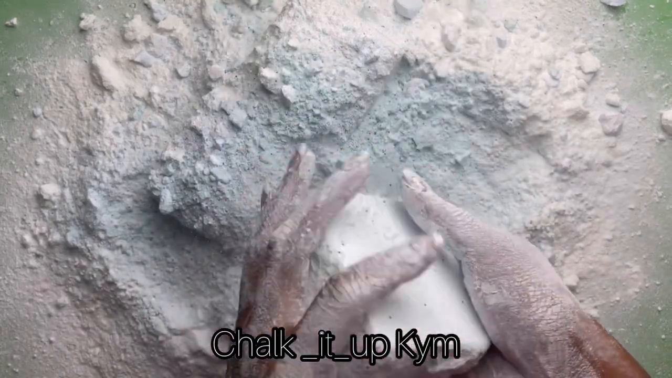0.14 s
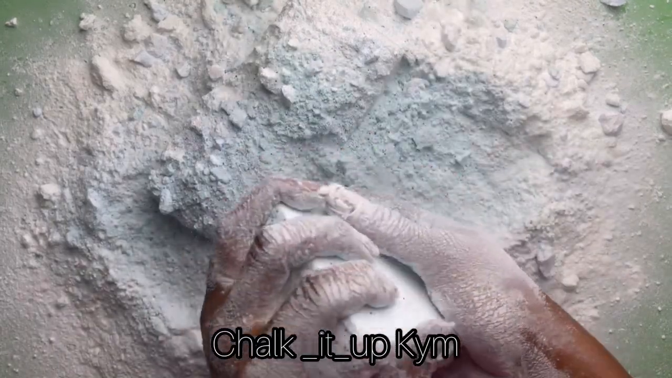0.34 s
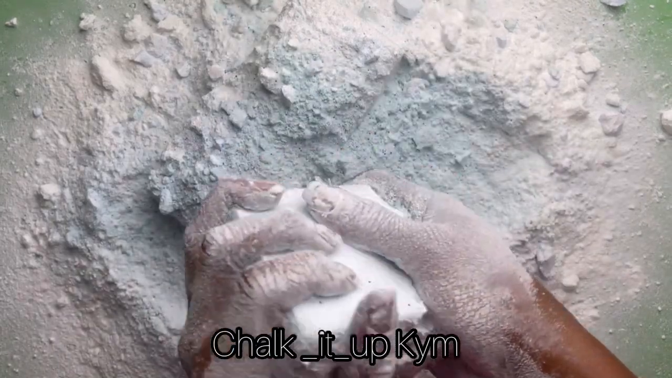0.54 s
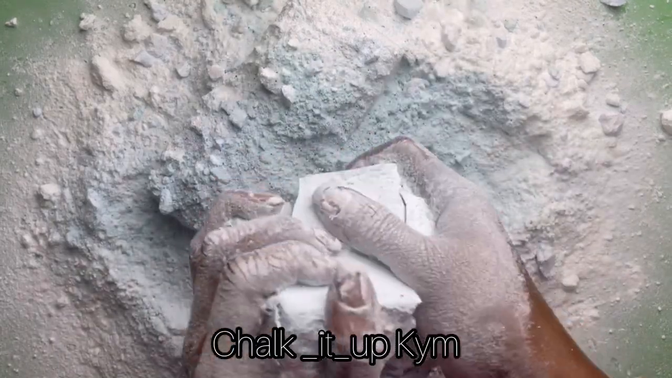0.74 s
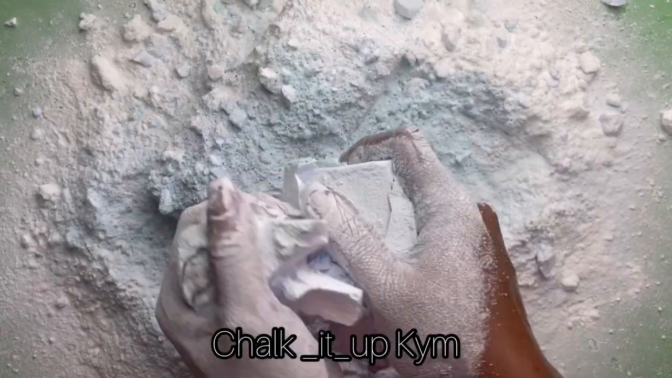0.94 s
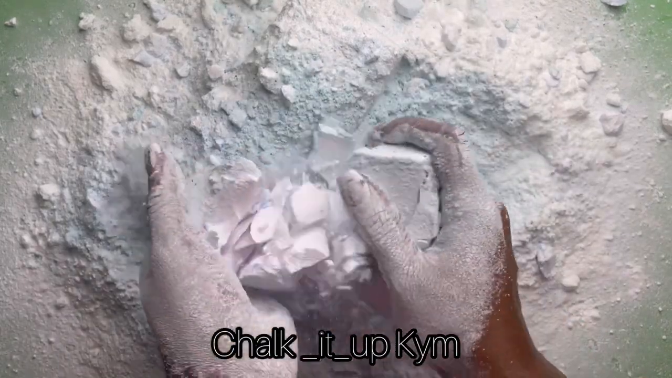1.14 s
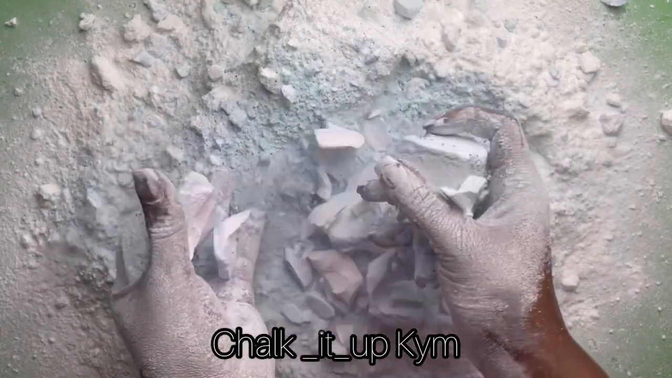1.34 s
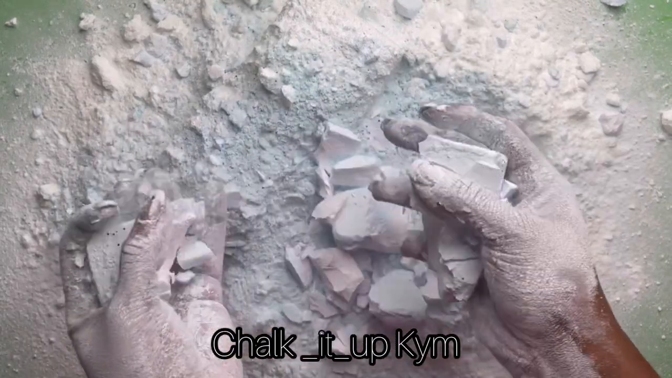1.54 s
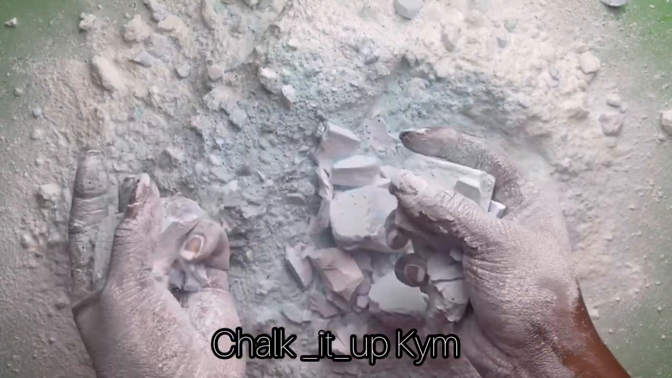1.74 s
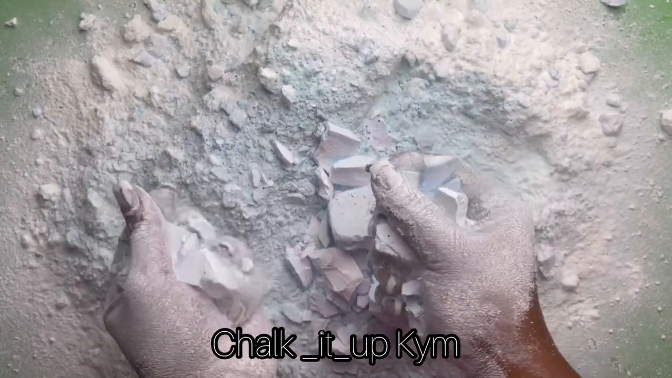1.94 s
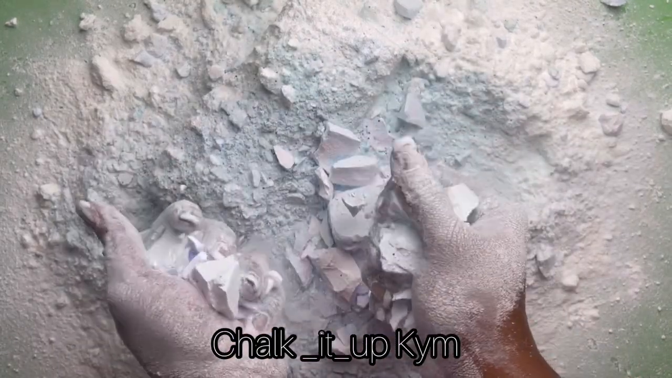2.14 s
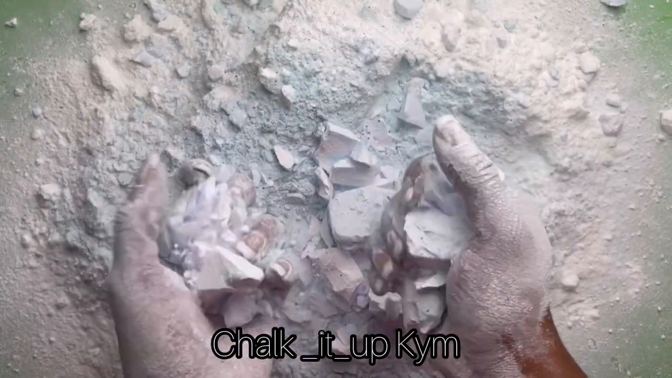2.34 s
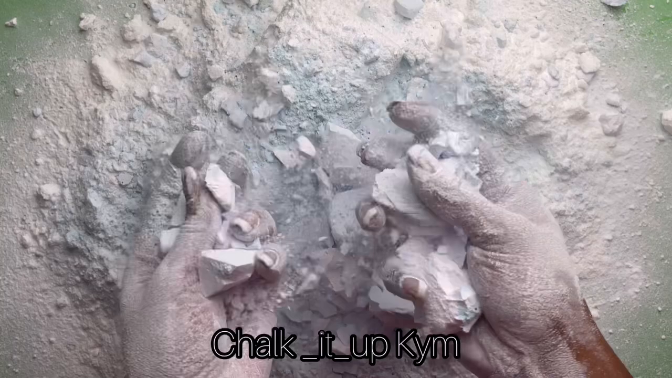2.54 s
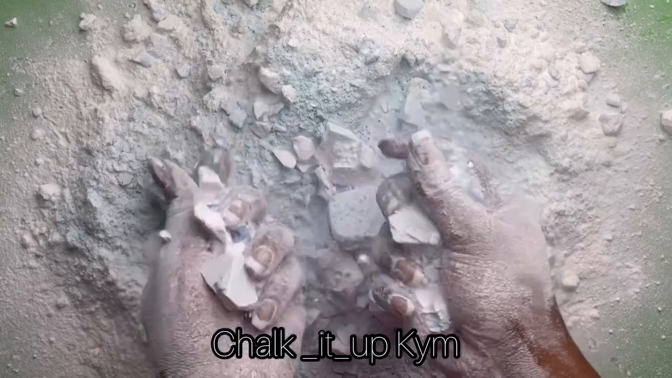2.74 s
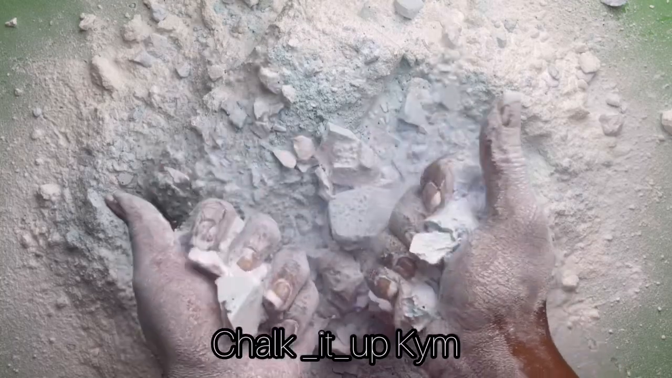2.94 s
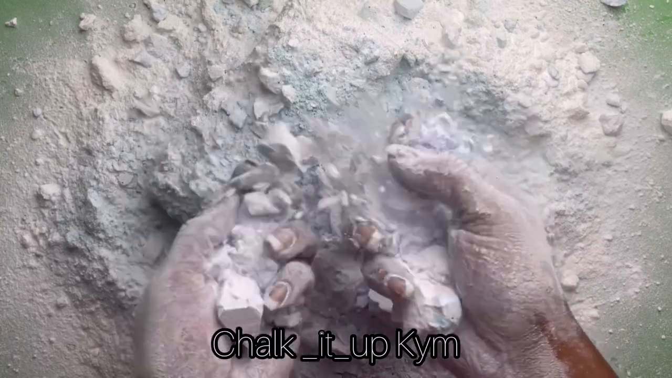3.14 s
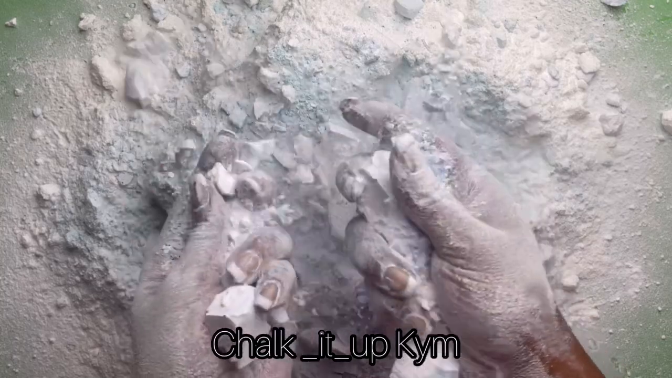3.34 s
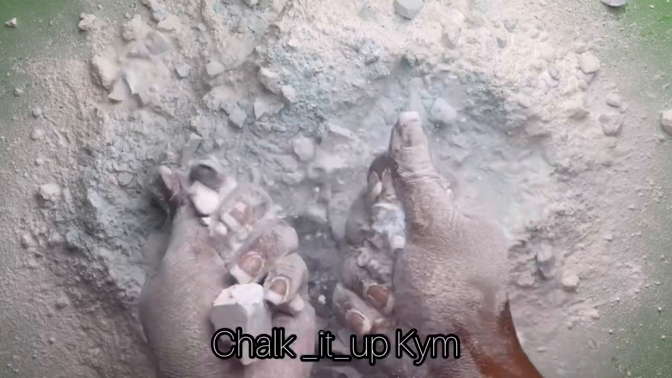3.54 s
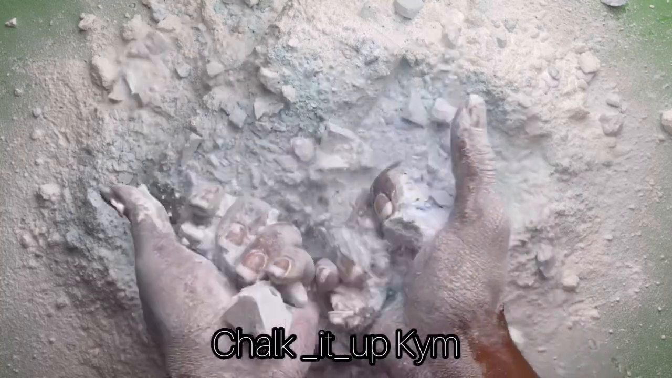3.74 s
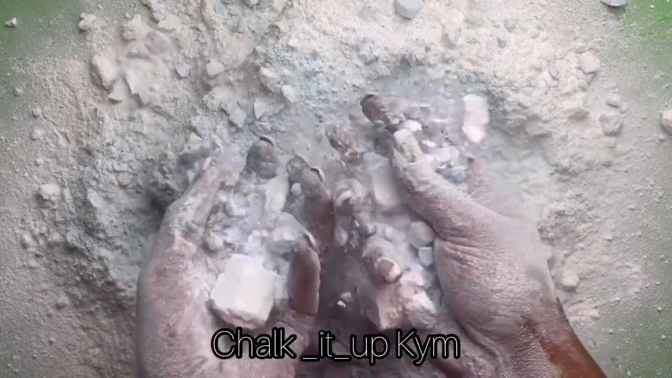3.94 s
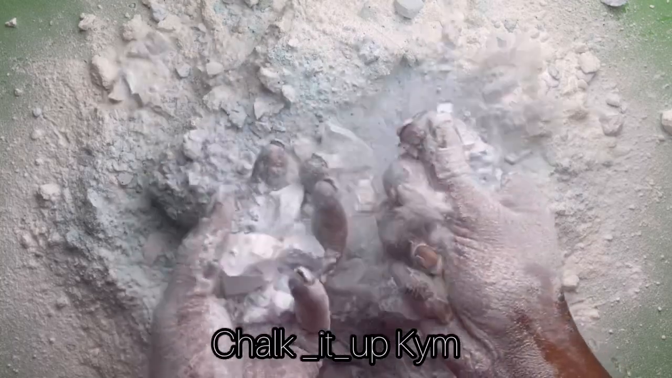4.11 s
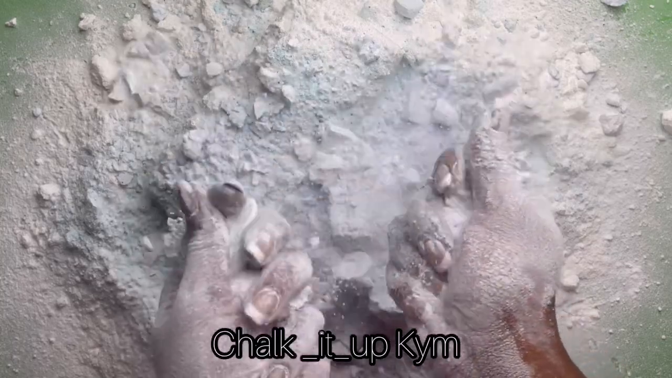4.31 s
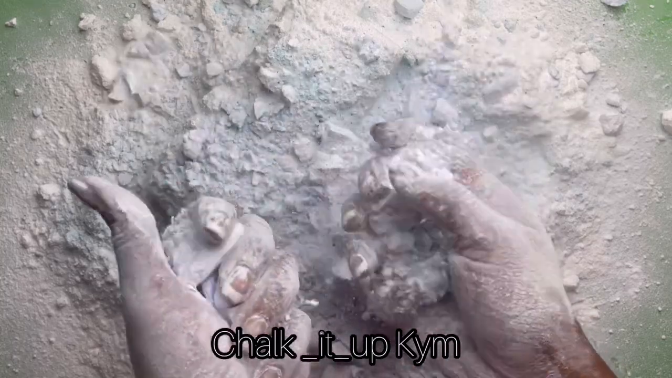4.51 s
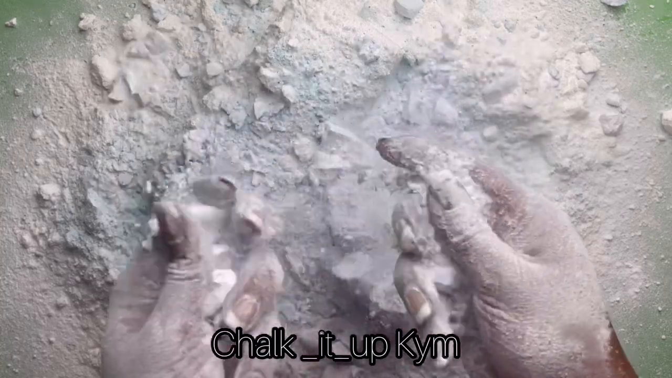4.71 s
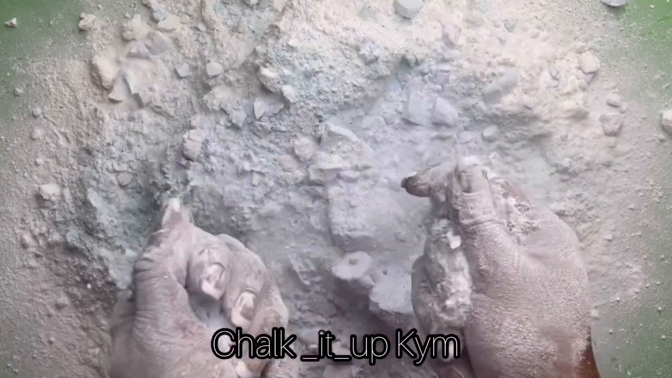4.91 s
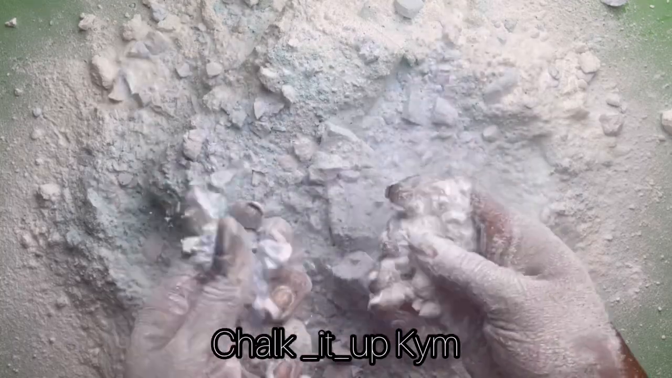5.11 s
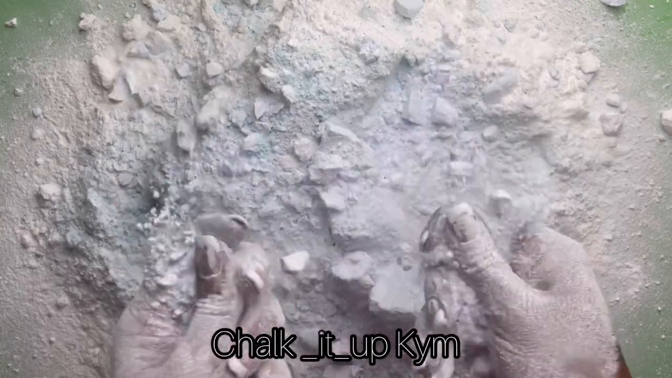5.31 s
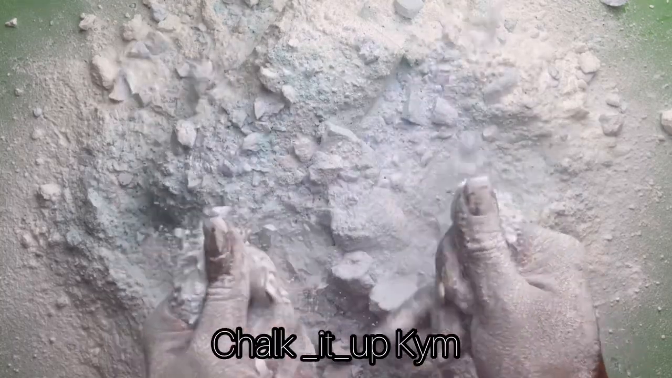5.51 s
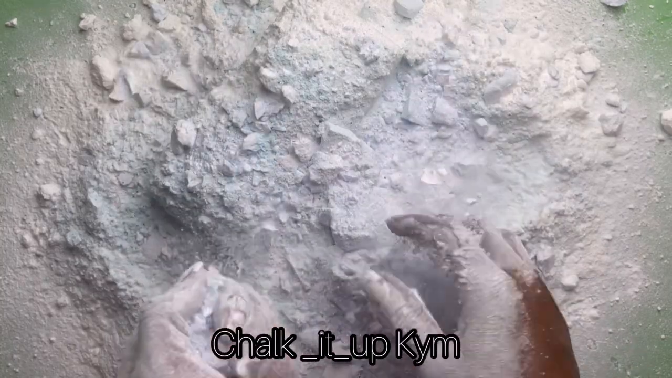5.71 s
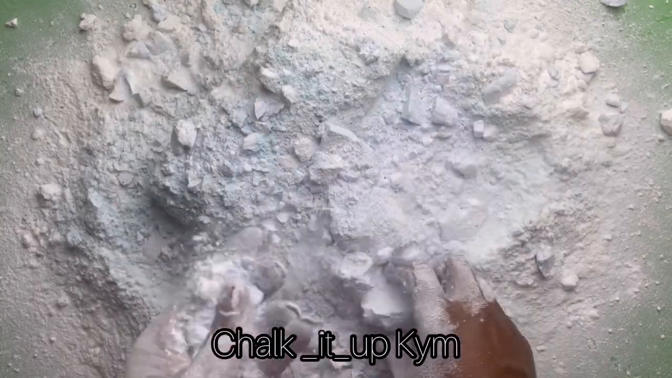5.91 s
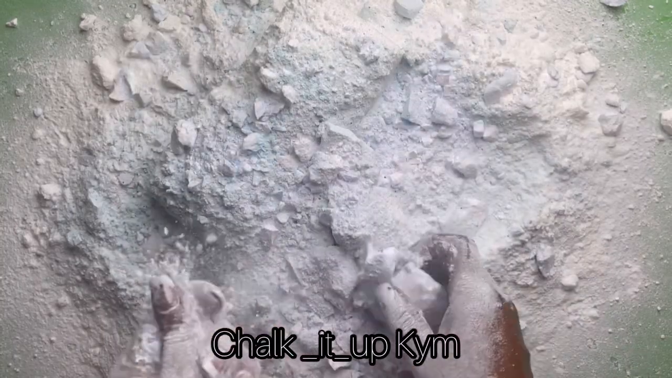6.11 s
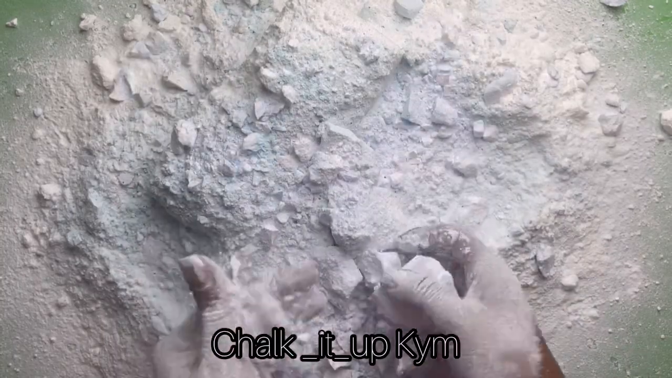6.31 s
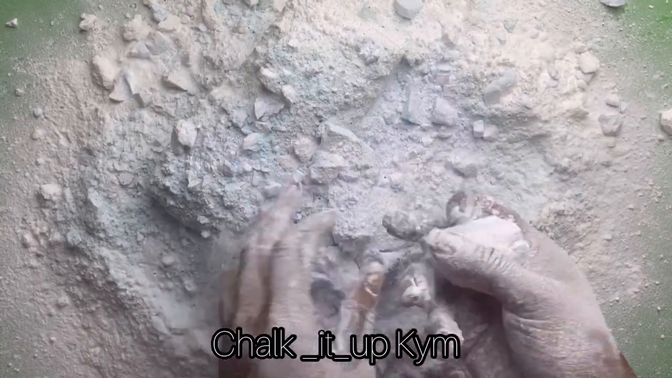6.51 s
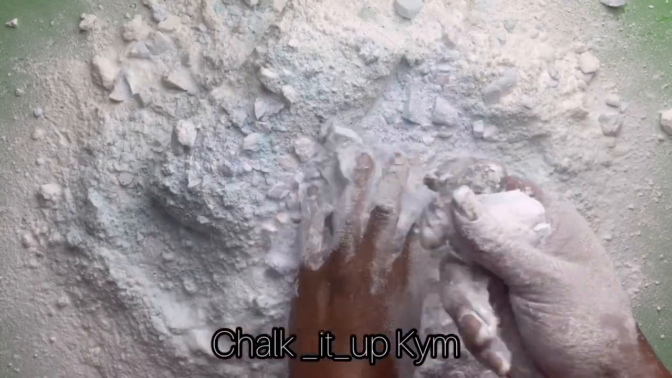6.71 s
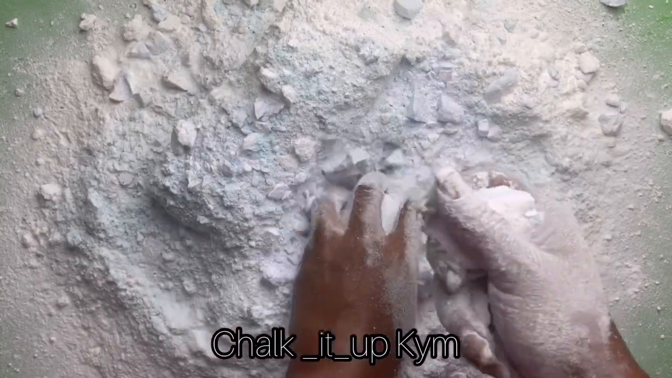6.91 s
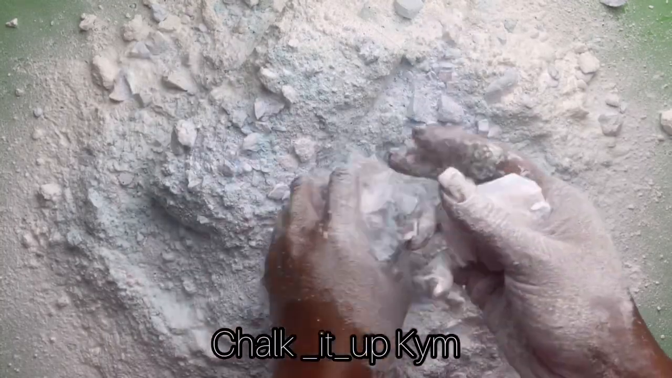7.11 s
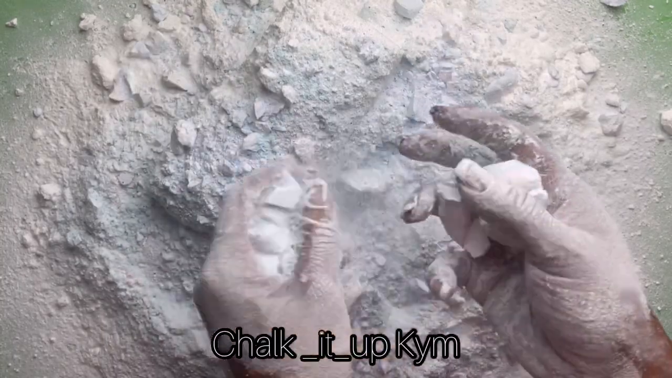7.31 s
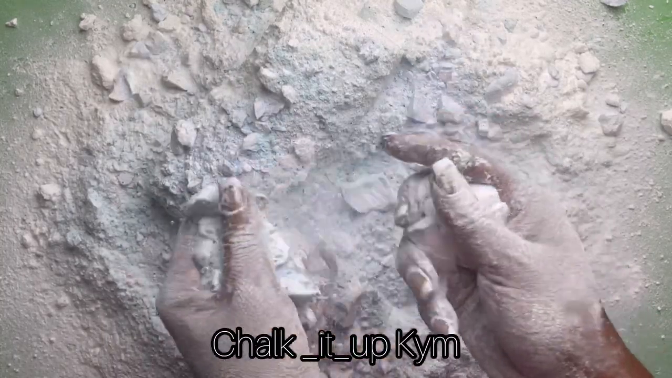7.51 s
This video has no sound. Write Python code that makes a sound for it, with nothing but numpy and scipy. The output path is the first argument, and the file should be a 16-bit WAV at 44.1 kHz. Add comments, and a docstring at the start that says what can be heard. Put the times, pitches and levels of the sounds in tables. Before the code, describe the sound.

A close phone microphone in a small room with faint, low air noise and a short wall reflection. A soft powdery rub comes first, then around 0.55 s a dry chalk block cracks sharply; at 0.68 s come the loudest snaps, hard and briefly clipped, with grating crunch between. Crumbs grind until 0.9 s, a muffled low thud falls near 1.26 s, with lighter cracks around it. From 1.92 to 2.2 s a second dense cluster of loud snaps scatters debris, with single strong cracks at 2.76 and 3.45 s. Until 5.7 s fingers squeeze irregularly: gritty crunches, small ticks, dusty hiss, weaker snaps, dull thumps near 3.3 and 4.2 s. From 5.8 to 6.6 s it is quieter, with soft landings and light rustle. A deeper thud at 6.74 s, a sharp crack at 6.9 s, and several brittle breaks around 7.3 s finish over shifting powder.

```python
"""A small room, a phone close to two hands that crush dry chalk blocks over a pile of loose powder.
Each fracture is a short pressure pulse trailed by micro-cracks. Between fractures random clicks, each
rung through a short response, make grinding crumbs, ticking chips and flakes, and hissing powder.
Hands and lumps thud softly into the pile: slow noise pushes rock the work top.
Walls answer with a decaying noise tail over steady air noise; the hardest snaps overload the microphone."""
import sys
import numpy as np
from scipy import signal
from scipy.fft import rfft, irfft
from scipy.io import wavfile
from scipy.ndimage import uniform_filter1d

SR = 44100
rng = np.random.default_rng(int(sys.argv[2]) if len(sys.argv) > 2 else 0)


def master(y):
    """Save y as 16-bit WAV."""
    cut = np.clip(np.atleast_2d(y).T, -1, 1)
    pcm = np.round(cut * 32767)  # scale
    wavfile.write(sys.argv[1], SR, pcm.astype(np.int16))


N = 332955
TIME = np.arange(N) / SR

# All table levels are relative: gains of the mix come on top.
# Steady air noise of the room: (frequency [Hz], level [dB])
AIR_COLOUR = [(20, 6.5), (50, 13.5), (80, 1), (200, -11.5), (350, -9.5), (600, -33), (2000, -56),
              (7000, -31), (15500, -20)]
# Echoes of the near walls: (frequency [Hz], level [dB])
ECHO_COLOUR = [(80, -10), (300, -1), (800, 1), (1400, 2.5), (2500, -2), (5000, -0.5), (15000, -3)]
# Response of the microphone: (frequency [Hz], level [dB])
MIC_RESPONSE = [(60, -1), (400, 0.5), (650, 6), (850, 4), (960, -5.5), (1080, -1), (1300, -2.5),
                (1800, -1.5), (3000, 0.5), (4000, 1), (4800, 0), (6500, -0.5), (9500, -2), (15000, -2)]
# Ring of the hollow hands and the work top: (frequency [Hz], time to fall 60 dB [s], level [dB])
HOLLOW_MODES = [(248.5, 0.073, -34), (430, 0.022, -35), (1088, 0.038, -33), (1265, 0.016, -23.5),
                (1660, 0.023, -30.5), (2165, 0.19, -56), (3940, 0.018, -35), (5450, 0.02, -40),
                (6860, 0.039, -25), (7440, 0.004, -24.5)]
# Hands and lumps landing on the pile:
# (time [s], thud of the work top [dB], decay of the push [s], slumping powder [dB], length of the slump [s])
LANDINGS = [(0.68, -48, .025, -32, .025), (1.12, -46, .04, -44, 0.11), (1.258, -28, .065, -27.5, 0.063),
            (1.457, -38, .04, -40.5, 0.044), (3.325, -31, .021, -40, 0.14), (3.575, -41, .026, -43, 0.037),
            (3.935, -52, .03, -44, 0.043), (4.164, -36, 0.042, -41.5, 0.076),
            (5.274, -47, .044, -43, 0.039), (5.839, -36, .075, -41.5, .09), (6.11, -52, .03, -43.5, 0.029),
            (6.388, -40, 0.035, -42.5, 0.052), (6.74, -27, 0.048, -40, 0.14),
            (6.9, -37, 0.13, -34.5, 0.061), (7.32, -48, .03, -38.5, 0.079)]
# Spectra of the slumping pile, hissing powder and grinding crumbs: (frequency [Hz], level [dB])
PILE_COLOUR = [(20, -21.5), (50, 1), (85, 0.5), (130, -0.5), (225, -2), (380, -6), (650, -18), (1500, -48)]
POWDER_COLOUR = [(800, -14.5), (2000, 3.5), (4000, 2.5), (7500, 3.5), (10000, 2), (15500, -6)]
CRUMB_COLOUR = [(120, -12), (300, 9), (600, -5.5), (1300, 3), (2200, 1.5), (3500, -7.5), (6000, -24),
                (14000, -17)]
# Loose chalk shifting while the hands move: (time [s], crumbs [dB], powder [dB], pile [dB])
STIRRING = [(0.36, -62, -58, -57), (0.56, -53, -56, -57), (0.72, -41, -48, -48), (0.99, -47, -52.5, -52.5),
            (1.37, -46, -52.5, -47), (1.67, -54, -52, -53), (1.97, -43, -50.5, -57),
            (2.84, -49, -48.5, -46.5), (3.12, -46, -52, -63), (3.4, -40.5, -47.5, -47),
            (3.84, -48.5, -50.5, -55.5), (4.24, -46, -49, -47.5), (5.13, -51, -52.5, -58),
            (5.45, -44, -55, -47.5), (6.68, -60.5, -57.5, -53.5), (6.84, -48, -58, -42),
            (7.24, -52, -55, -58), (7.5, -43.5, -47, -55)]
# Squeezes and rubs of the fingers: (start [s], length [s], grinding crumbs [dB], hissing powder [dB])
SQUEEZES = [(0.086, 0.17, -56, -39), (0.812, 0.074, -34, -39.5), (0.9, .07, -51, -43.5),
            (1.109, 0.1, -38.5, -42.5), (1.241, 0.073, -34.5, -40), (1.391, 0.044, -61, -42),
            (1.477, .045, -42.5, -42), (1.658, 0.058, -37, -49), (1.792, 0.14, -44.5, -47),
            (2.1, 0.07, -44, -41.5), (2.267, 0.15, -47.5, -51), (2.42, 0.29, -44.5, -45),
            (2.659, 0.048, -34, -39.5), (2.773, 0.15, -41.5, -48), (3.174, 0.068, -42, -43),
            (3.318, .1, -42, -50.5), (3.483, 0.13, -42.5, -49), (3.764, 0.025, -42, -46.5),
            (3.877, 0.14, -48.5, -52), (4.072, 0.034, -37, -46), (4.132, 0.05, -37.5, -46),
            (4.288, 0.13, -43.5, -49), (4.484, 0.025, -39, -55), (4.55, 0.039, -45.5, -52),
            (4.718, 0.063, -36.5, -44), (4.828, 0.037, -39.5, -55), (5.179, 0.055, -44.5, -51),
            (5.252, 0.11, -41.5, -48.5), (5.398, 0.059, -43, -48.5), (5.497, 0.031, -41, -51),
            (5.566, 0.032, -47, -47), (5.666, 0.062, -37.5, -45.5), (5.765, 0.035, -41.5, -54),
            (5.985, 0.068, -45.5, -50.5), (6.214, 0.066, -50.5, -52), (6.37, 0.074, -44, -51.5),
            (6.672, .09, -44, -46.5), (6.79, 0.21, -42.5, -51.5), (7.318, 0.038, -38.5, -45),
            (7.423, 0.041, -39, -40)]
# The first block strains around its main break: (time [s], level [dB])
STRAIN = [(.55, -68), (.59, -39), (.63, -37), (.72, -39), (.78, -52), (.84, -67)]
# Fractures: (time [s], strength [dB], pitch of the crack [Hz],
# dull knock of the lump [dB re strength], fine splinters [dB re strength])
SNAPS = [(0.51, -37, 3380, -7, 7), (0.5451, -10.5, 1600, -1.5, -26), (0.5461, -8.5, 3600, -8.5, -26),
         (0.551, -14, 1380, -5, 6), (0.565, -15, 1530, -6.5, -7), (0.579, -18, 1350, -1, -8),
         (0.676, -6, 1700, -4, -16), (0.6766, 3, 1500, -11, -6), (0.679, -5.5, 1460, -10, -24),
         (0.6837, -12, 1760, -2, -11), (0.6859, -7, 1810, -20, -3), (0.7366, -14.5, 1710, -7.5, -8),
         (0.8219, -13, 1580, -6.5, -13), (0.8432, -12.5, 2120, -24, -11), (0.8576, -18.5, 2750, -22, -22),
         (0.8651, -20.5, 1990, -18, 1), (1.0468, -32.5, 834, -26, 2.5), (1.2816, -28, 1760, -2, -20),
         (1.3225, -15.5, 1120, -4, -26), (1.3708, -28, 9000, -26, -22), (1.5224, -26.5, 1850, -12, -6),
         (1.6576, -23.5, 3700, -10, 1), (1.697, -15, 2040, -10.5, -1), (1.9201, -2, 1010, -3, -5),
         (1.9212, 0, 1700, -20, -20), (1.925, -14.5, 1520, -16, 9), (1.9406, -4, 1770, -5.5, -3),
         (1.9447, -3.5, 1490, -15, -22), (1.9653, -6.5, 1560, -11, -5), (2.005, -23.5, 2040, 1, 6),
         (2.011, -3, 1960, -14.5, 0), (2.0202, -21.5, 2570, 5, -22), (2.076, -22.5, 1940, -12, -22),
         (2.1024, -12, 1320, -9, -16), (2.135, -13, 2100, -7, 5), (2.1677, -29, 2750, -25, 10.5),
         (2.182, -7.5, 1190, -4.5, -15), (2.4433, -22.5, 2070, -17, -6), (2.5088, -19, 1950, -8, -24),
         (2.5427, -23, 1170, -28, -4), (2.596, -25, 1070, 0, -13), (2.757, -3.5, 1710, -10, -30),
         (2.788, -24.5, 1910, 3, -20), (2.8164, -23, 2550, -10, -22), (2.8345, -17, 1050, -1, -8.5),
         (2.8875, -24.5, 2530, -3, -12), (2.9595, -28, 1500, -29, 9), (3.0211, -31.5, 1080, -5, -22),
         (3.1034, -24, 1320, -31, -13), (3.3069, -22.5, 1410, -22, -6), (3.3225, -11, 1400, -7, -35),
         (3.4454, -5, 2830, -8, -7.5), (3.5124, -21, 1140, -0.5, -7), (3.5398, -22, 2390, -5, -5.5),
         (3.5716, -31.5, 596, 5, -22), (3.7123, -20, 2490, -21, -27), (3.894, -28, 3450, -7, -22),
         (3.931, -26.5, 1930, -1, -5), (4.3544, -22, 1240, -8.5, -27), (4.5059, -24.5, 1120, -12, -27),
         (4.589, -25.5, 1580, -26, -27), (4.7417, -17.5, 1480, -7, -1), (4.7641, -23.5, 2060, -7, -1),
         (4.8725, -24, 2760, -26, -27), (4.9574, -24, 1570, -11, -2), (5.1044, -16.5, 2860, -23, -36),
         (5.2889, -18.5, 2150, -24, -16), (5.2964, -20.5, 1490, -0.5, -4.5),
         (5.3963, -18.5, 1970, -17, -29), (5.4294, -23.5, 1330, -2, -7), (5.5127, -21, 1390, -11, -29),
         (5.5275, -23.5, 460, -32, -13), (5.663, -28.5, 1770, -12, -1.5), (5.682, -20, 2230, -21, -20),
         (6.402, -26.5, 3220, -8, -28), (6.9029, -9.5, 1640, -9, -19), (6.9066, -14.5, 2020, -8.5, -9.5),
         (7.1824, -26, 1800, -6, 1.5), (7.3066, -12, 1250, -5.5, -15), (7.3424, -15.5, 1900, 5, -15),
         (7.3453, -13.5, 1670, -7, -1.5), (7.4413, -21, 2200, -10, -1)]

# Movements of the hand: a grip tightens and lets go; a hand sinks into the pile more slowly.
GRIP_ATTACK_S, GRIP_RELEASE_S = 0.011, 0.026
SINK_ATTACK_S, SINK_RELEASE_S = 0.015, 0.064
SINK_LEAD_S = 0.023  # the slump begins this long before the thud
SWELL_SHARE = 0.12  # share of a movement's length added to its attack
# Trims of the stirring table
STIR_CRUMB_DB, STIR_POWDER_DB, STIR_PILE_DB = -1.7, 0, -0.2
# Every fracture sheds crumbs and dust (relative to its strength); some of all crumbs drop into the pile.
SHED_S, SHED_CRUMB_DB, SHED_POWDER_DB = 0.023, -29, -31.5
DROP_DB = -9.5
KNOCK_HZ = 220  # a breaking lump knocks against the palm
TOP_HZ = 15650  # upper limit of the microphone


def undb(db):
    """Decibels to gain."""
    return 10 ** (np.asarray(db) / 20)


def curves(table):
    """Every column of a table of (time, ..) rows, joined by straight lines."""
    s, *columns = np.transpose(table)
    return [np.interp(TIME, s, column) for column in columns]


def unit(x):
    """Scale to rms 1."""
    return x / np.sqrt(np.mean(x ** 2))


def unit_energy(x):
    """Scale a short response to energy 1."""
    return x / np.sqrt(np.sum(x ** 2) + 1e-18)


def convolve(x, response):
    """Pass x through a response, keeping its length."""
    return signal.fftconvolve(x, response)[:len(x)]


def colour(x, points, size=4096):
    """Minimum-phase filter with the given (Hz, dB) outline."""
    hz, db = np.transpose(points)
    bin_hz = np.arange(size // 2 + 1) * SR / size
    outline_db = np.interp(np.log(bin_hz + 1), np.log(hz), db)
    # folding the cepstrum forward keeps the response causal
    cepstrum = irfft(np.log(undb(outline_db)))[:size // 2]
    cepstrum[1:] *= 2
    return convolve(x, irfft(np.exp(rfft(cepstrum, size))))


def walk(rate):
    """Random levels held 1 / rate seconds and smoothed twice, at rms 1."""
    hold = max(int(SR / rate), 2)
    steps = np.repeat(rng.standard_normal(N // hold + 1), hold)
    smooth = uniform_filter1d(uniform_filter1d(steps, hold), hold)
    return unit(smooth[:N])


def pulse(hz, q, softness, size=1024):
    """One push and pull of air around hz, rounded by the softness of the chalk."""
    s = 1j * np.arange(size // 2 + 1) * SR / size / hz
    resonance = s / (1 + s / q + s * s)
    return unit_energy(irfft(resonance / (1 + s * softness) ** 2))


def decay_t60(t, t60_s):
    """Amplitude that falls 60 dB in t60_s."""
    return np.exp(-np.log(1000) * t / t60_s)


def grains(rate, spread_db):
    """Random clicks of either sign, rate a second: many small ones and a few large ones."""
    size = undb(spread_db * np.minimum(rng.exponential(size=N), 3.5))
    struck = rng.random(N) < rate / SR
    return unit(struck * size * rng.choice([-1, 1], N))


def fade(x, decay_s):
    """Let every impulse in x die away exponentially."""
    return signal.lfilter([1], [1, -np.exp(-1 / (decay_s * SR))], x)


def avalanches(rate, decay_s):
    """Gain of a sticking and slipping grip: sudden bursts that die in milliseconds, over a steady grind."""
    slips = (rng.random(N) < rate / SR) * rng.uniform(0.5, 2.6, N)
    return 1 + fade(slips, decay_s)


def air():
    """The air of the room is steady noise."""
    return unit(colour(rng.standard_normal(N), AIR_COLOUR))


def room(x, t60_s=0.17, wet_db=-13, size=20000):
    """Near walls return a short diffuse tail that builds in about a millisecond."""
    t = np.arange(size) / SR
    tail = rng.standard_normal(size) * decay_t60(t, t60_s) * (1 - np.exp(-t / 0.0011))
    echoes = colour(convolve(x, unit_energy(tail)), ECHO_COLOUR)
    return x + undb(wet_db) * echoes


def hollow(x, bounce_s=0.0021, bounce_db=-15, size=4096):
    """The direct sound, its bounce off the work top, and the brief ring of the cupped hands."""
    t = np.arange(size) / SR
    ring = np.zeros(size)
    for hz, t60_s, db in HOLLOW_MODES:
        ring += undb(db) * unit_energy(np.cos(2 * np.pi * hz * t) * decay_t60(t, t60_s))
    bounce = undb(bounce_db) * np.interp(TIME - bounce_s, TIME, x, left=0)
    return x + bounce + convolve(x, ring)


def thuds(top_hz=52, rise_s=0.0028, size=22000):
    """A soft, uneven push through the powder rocks the work top at its lowest mode."""
    out, t = np.zeros(N + size), np.arange(size) / SR
    rocking = pulse(top_hz, q=2.4, softness=0.54, size=8192)
    for s, db, decay_s, *_ in LANDINGS:
        push = rng.standard_normal(size) * (1 - np.exp(-t / rise_s)) * np.exp(-t / decay_s)
        thud = np.sqrt(decay_s * SR) * unit_energy(convolve(push, rocking))  # longer pushes carry more energy
        start = int(s * SR)
        out[start:start + size] += undb(db) * thud
    return out[:N]


def pile():
    """The loose powder gives way in runs of small dull slumps."""
    slumps = grains(rate=900, spread_db=2) * avalanches(rate=30, decay_s=0.004)
    return unit(colour(slumps, PILE_COLOUR))


def gesture(start, length, attack_s, release_s):
    """Gain of one hand movement: it builds, holds and dies away; long ones build more slowly."""
    t = TIME - start
    build = np.clip(t / (attack_s + SWELL_SHARE * length), 0, 1)
    return build * np.exp(-np.clip((t - length) / release_s, 0, 20))


def shedding():
    """Power of the debris that runs out of the fresh cracks."""
    opened = np.zeros(N)
    for s, db, *_ in SNAPS:
        opened[int(s * SR)] += undb(db) ** 2
    return fade(opened + 1e-18, SHED_S / 2)  # power dies twice as fast as amplitude


def handling():
    """Gains of crumbs, powder and pile: stirring, shed debris, squeezes and landings add in power."""
    crumb_db, powder_db, pile_db = curves(STIRRING)
    shed = shedding()
    crumb = undb(crumb_db + STIR_CRUMB_DB) ** 2 + undb(SHED_CRUMB_DB) ** 2 * shed
    dust = undb(powder_db + STIR_POWDER_DB) ** 2 + undb(SHED_POWDER_DB) ** 2 * shed
    for start, length, grind_db, hiss_db in SQUEEZES:
        grip = gesture(start, length, GRIP_ATTACK_S, GRIP_RELEASE_S) ** 2
        crumb += undb(grind_db) ** 2 * grip
        dust += undb(hiss_db) ** 2 * grip
    slump = undb(pile_db + STIR_PILE_DB) ** 2 + undb(DROP_DB) ** 2 * crumb
    for s, _, _, slump_db, length in LANDINGS:
        sink = gesture(s - SINK_LEAD_S, length, SINK_ATTACK_S, SINK_RELEASE_S)
        slump += (undb(slump_db) * sink) ** 2
    return np.sqrt([crumb, dust, slump])


def powder():
    """Fine dust shears between skin and chalk in a dense, slightly fluttering hiss."""
    dust = grains(rate=12000, spread_db=1.5) * undb(walk(220))
    return unit(colour(dust, POWDER_COLOUR))


def flakes():
    """Thin flakes tick as they break off, each size at its own pitch."""
    out = np.zeros(N)
    for hz in np.geomspace(2500, 12500, 9):
        out += convolve(grains(rate=60, spread_db=4.5), pulse(hz, q=3.5, softness=0.2))
    return unit(out)


def chips(rate=6, low_hz=1000, high_hz=3600):
    """Small lumps give way one by one, each with a single dry tick."""
    out = np.zeros(N)
    for hz in np.geomspace(low_hz, high_hz, 4):
        out += convolve(grains(rate, spread_db=4.0), pulse(hz, q=1.3, softness=0.1))
    return unit(out)


def crumbs():
    """Crumbs of many sizes burst in quick clusters, alone and all together; coarse ones sound lower."""
    out = np.zeros(N)
    for hz in np.geomspace(400, 6400, 7):
        bursts = grains(rate=380, spread_db=4.5) * avalanches(rate=14, decay_s=0.004)
        out += np.sqrt(hz) * convolve(bursts, pulse(hz, q=1.5, softness=0.073))
    shared_slip = avalanches(rate=26, decay_s=0.0035)
    return unit(colour(out * shared_slip, CRUMB_COLOUR))


def strain(grit_hz=1550):
    """The two faces of a crack grate on each other inside the closed hands, in a narrow nasal crunch."""
    strain_db, = curves(STRAIN)
    grit = grains(rate=1500, spread_db=3)
    return undb(strain_db) * unit(convolve(grit, pulse(grit_hz, q=1.8, softness=0.68)))


def snaps(trail_db=-4.5, debris_s=0.013, debris_db=-17, size=2048):
    """A crack opens with one pulse; micro-cracks run on for milliseconds and debris scatters behind."""
    out, t = np.zeros(N + size), np.arange(size) / SR
    knock = pulse(KNOCK_HZ, q=0.64, softness=0.15)
    splinter = pulse(7200, q=1.2, softness=0.89)
    for s, db, hz, knock_db, splinter_db in SNAPS:
        chance = rng.standard_normal((3, size)) ** 3  # cubing leaves a few strong spikes
        q = rng.uniform(1.15, 1.9)  # every lump is damped a little differently
        late = t > 0.6 / hz
        cracks = undb(trail_db) * unit_energy(chance[0] * late * np.exp(-t / 0.003))
        cracks += undb(debris_db) * unit_energy(chance[1] * late * np.exp(-t / debris_s))
        cracks[0] += 1  # the opening pulse
        body = pulse(hz, q, softness=0.32) + undb(knock_db) * knock
        splinters = unit_energy(convolve(chance[2] * np.exp(-t / 0.002), splinter))
        start = int(s * SR)
        out[start:start + size] += undb(db) * (convolve(cracks, body) + undb(splinter_db) * splinters)
    return out[:N] * np.sqrt(SR / 1000)  # a 0 dB pulse has the energy of 1 ms at rms 1


def scene():
    """The chalk breaking in the hands, the pile below them, the room and its air around."""
    crumb, dust, slump = handling()
    # flakes come off only where the chalk is both squeezed and rubbed
    flake = np.minimum(crumb, dust)
    grinding = crumb * (undb(-1.0) * crumbs() + undb(-7.5) * chips())
    grinding += undb(-1.5) * dust * powder()
    grinding += undb(-4.5) * flake * flakes()
    chalk = undb(-2.1) * snaps() + strain() + grinding
    ground = undb(-2.0) * slump * pile() + thuds()
    return (room(hollow(chalk) + ground) + undb(-49.5) * air())[None]


def record(dry):
    """The microphone colours the sound, clips the hardest snaps and cuts the top."""
    clipped = np.clip(colour(dry[0], MIC_RESPONSE), -1, 1)
    lowpass = signal.ellip(8, 0.2, 70, TOP_HZ, fs=SR, output="sos")
    return signal.sosfilt(lowpass, clipped)[None]


dry = scene()
out = record(dry)
master(out)
```